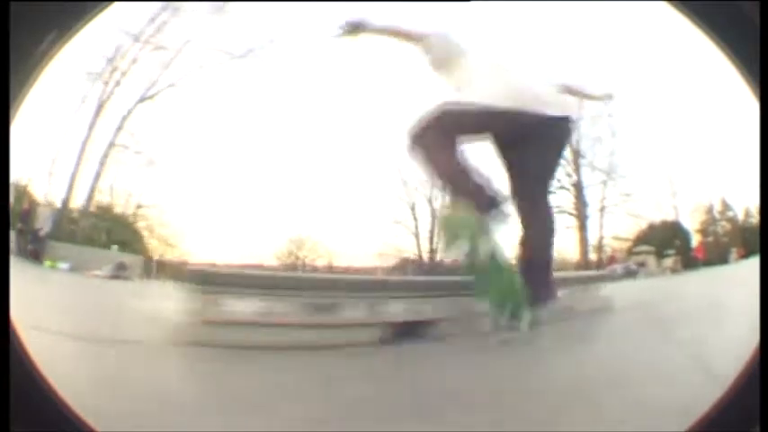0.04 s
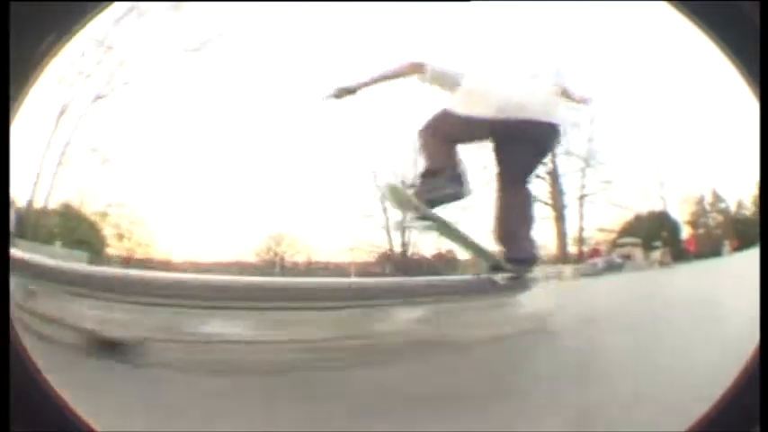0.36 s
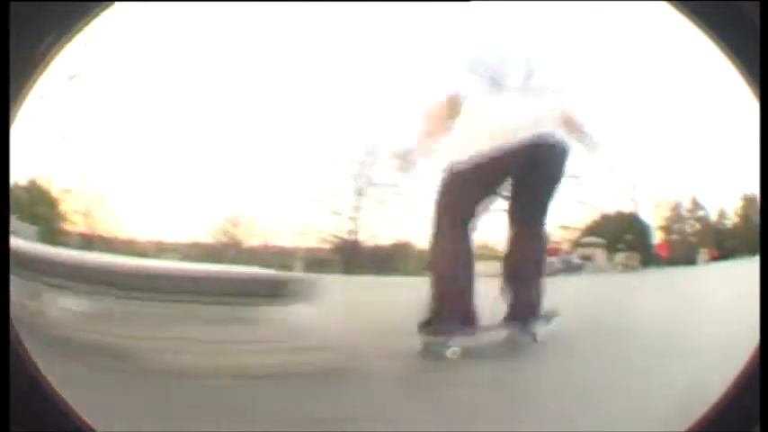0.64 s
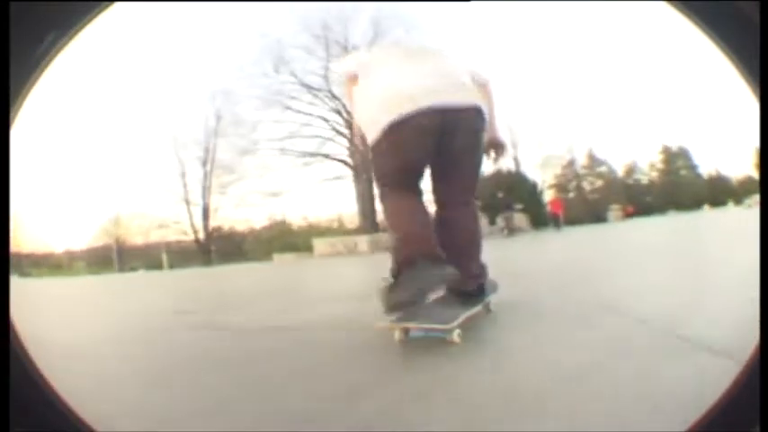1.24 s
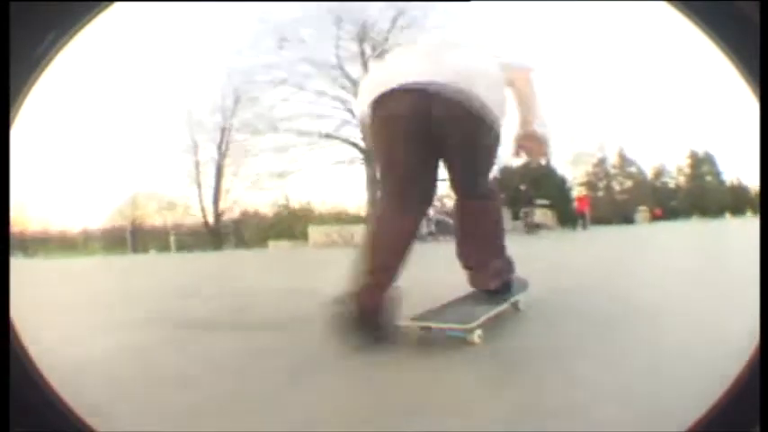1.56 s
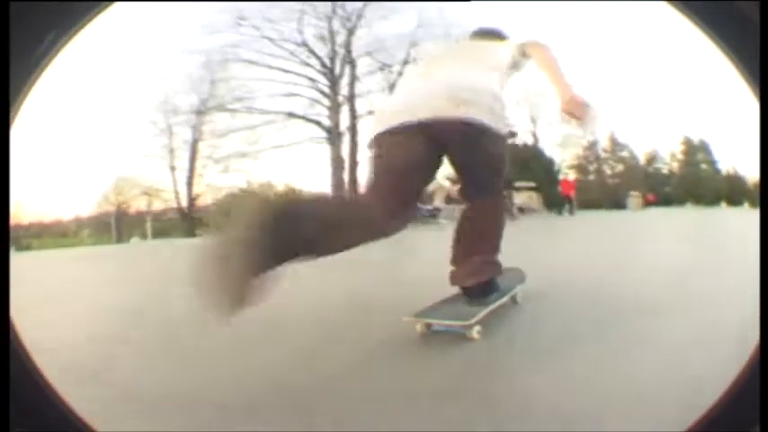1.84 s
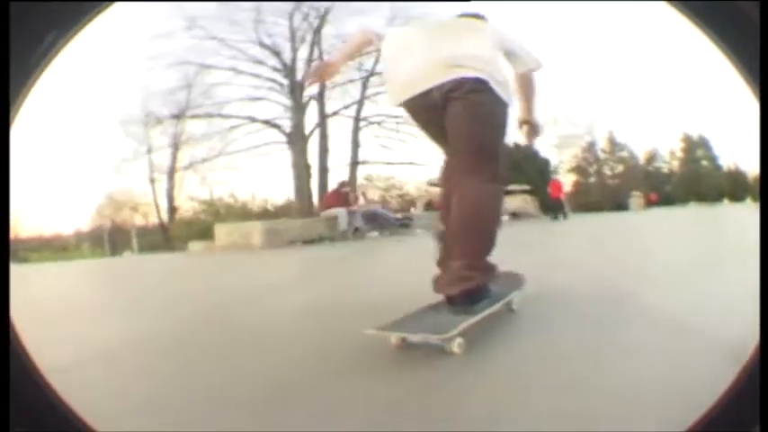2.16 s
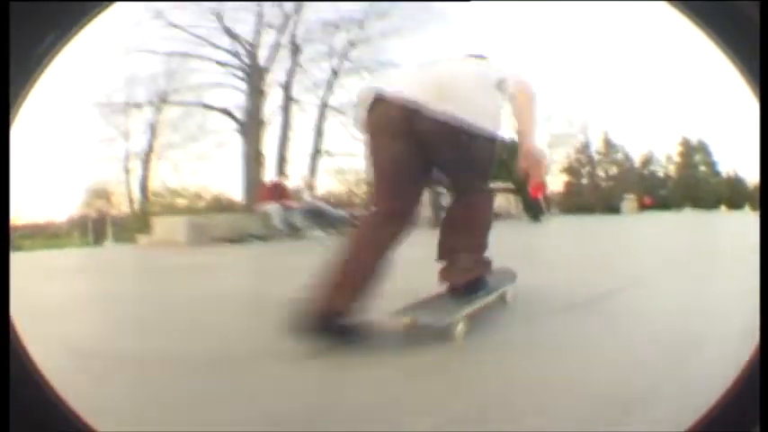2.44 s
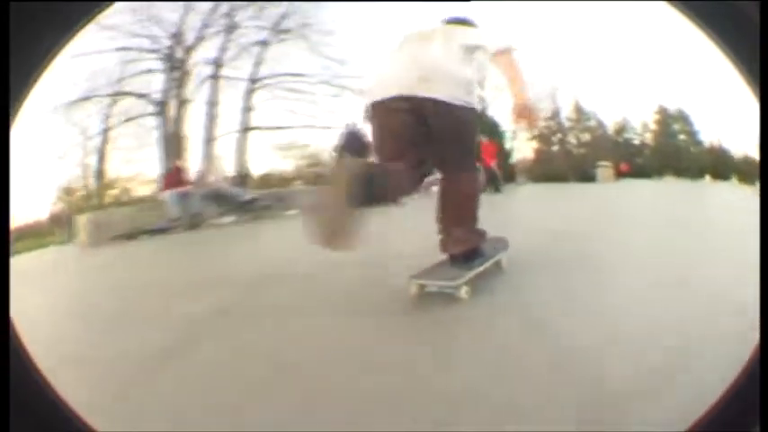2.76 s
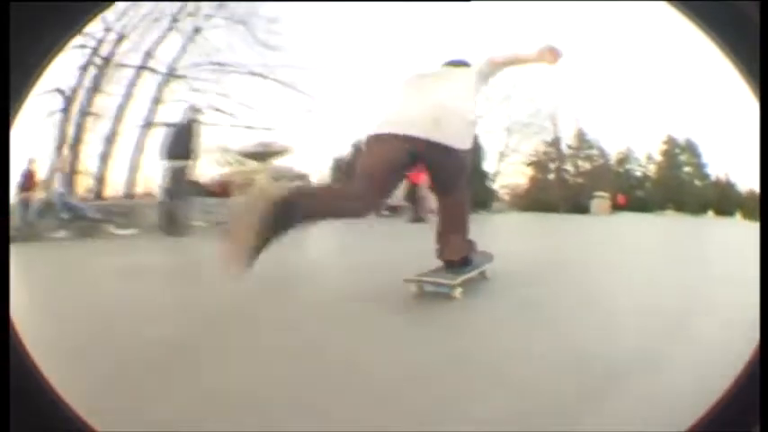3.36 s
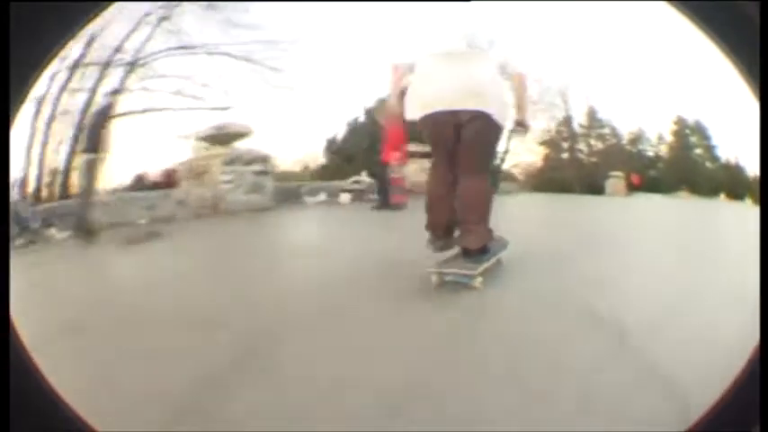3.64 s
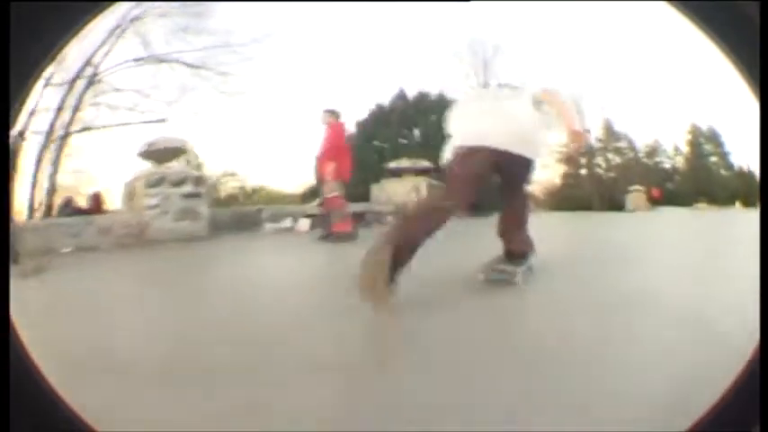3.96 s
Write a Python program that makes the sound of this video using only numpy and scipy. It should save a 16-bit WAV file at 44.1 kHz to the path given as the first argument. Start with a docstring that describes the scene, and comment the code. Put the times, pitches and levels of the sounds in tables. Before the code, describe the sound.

A skateboard pops, scrapes a ledge, lands and rolls on over concrete.

```python
"""A skateboarder pops his board, and its trucks strike a concrete ledge; each impact rings the deck.
The board slides briefly by stick-slip friction and slams down at about 0.6 s. He then pushes away
across a plaza: hard wheels rumble over grit and clack across joints, bearings hiss, and a shoe thuds
and scuffs. Throughout, a microphone follows close behind: air buffets its ports, and the big hits
overload it."""
import sys
import numpy as np
from scipy import signal
from scipy.fft import rfft, irfft, next_fast_len
from scipy.io import wavfile
from scipy.ndimage import map_coordinates

SR = 44100
rng = np.random.default_rng(int(sys.argv[2]) if len(sys.argv) > 2 else 0)


def master_out(mix):
    """Clip the mix to full scale and print it as 16-bit PCM to the path in sys.argv[1]."""
    frames = np.transpose(np.atleast_2d(mix))
    ceiling = np.clip(frames, -1, 1)
    pcm = np.round(ceiling * 32767).astype(np.int16)
    wavfile.write(sys.argv[1], SR, pcm)


N = 176400

# Envelopes of wind, rumble, wheel noise, gritty upper mids, bearing hiss and slide: t/s, level/dB
WIND_LEVEL = [(0.45, -63), (0.7, -41), (0.86, -39), (1.05, -40), (1.15, -58), (1.4, -39.5), (1.7, -52),
              (1.86, -30), (1.94, -30), (2.01, -39), (2.2, -43), (2.33, -37), (2.6, -39), (2.88, -31.5),
              (3.1, -33), (3.48, -32), (3.58, -24.5), (3.72, -47), (4, -39)]
RUMBLE_LEVEL = [(0, -35.5), (0.2, -33.5), (0.55, -42.5), (0.8, -36), (1.15, -41.5), (1.6, -38),
                (2.1, -32.5), (2.6, -37), (2.95, -33), (3.55, -30), (3.72, -43), (4, -30.5)]
ROLL_LEVEL = [(0, -26.5), (0.19, -27.5), (0.42, -32.5), (0.58, -32.5), (0.7, -30), (0.82, -28),
              (1.1, -28.5), (1.26, -24), (1.52, -26), (1.8, -28), (1.98, -26), (2.15, -22), (2.3, -26),
              (2.68, -26.5), (2.97, -22.5), (3.2, -24), (3.45, -25), (3.8, -23), (4, -24)]
WHIRR_LEVEL = [(0, -32), (0.2, -37), (0.5, -43.5), (1.1, -40.5), (1.3, -34.5), (1.55, -34), (1.78, -40.5),
               (2.1, -32), (2.3, -34), (2.7, -34.5), (2.98, -26.5), (3.15, -32.5), (3.4, -38), (3.6, -28),
               (3.78, -28.5), (4, -36.5)]
BEARING_LEVEL = [(0.0, -40), (0.17, -44.5), (0.44, -49), (1.12, -49.5), (1.3, -46.5), (1.68, -45),
                 (1.78, -53.5), (1.95, -44.5), (2.15, -45), (2.27, -47), (2.42, -43), (2.6, -50),
                 (2.8, -44), (3.1, -39.5), (3.44, -47), (3.62, -40.5), (3.87, -38), (3.97, -45)]
SLIDE_LEVEL = [(0.24, -29), (0.28, -32.5), (0.303, -21), (0.335, -20.5), (0.352, -17.5), (0.38, -15.5),
               (0.393, -18.5), (0.403, -31), (0.44, -43)]

# Spectra of the continuous sounds: f/Hz, level/dB
WIND_SPECTRUM = [(20, -26), (50, -2.5), (85, 5), (130, -6.5), (220, -8.5), (600, -62)]
RUMBLE_SPECTRUM = [(40, -13.5), (90, -16), (125, -3.5), (150, 3), (200, -3.5), (350, 0), (900, -60)]
ROLL_SPECTRUM = [(80, -35), (200, -27), (370, 2), (480, -3.5), (750, -1), (1180, -3), (1500, -13),
                 (2200, -20), (3000, -22.5), (4300, -29.5), (9000, -57)]
SING_SPECTRUM = [(400, -21), (750, -1.5), (930, 1), (1200, 0.5), (1400, -12), (2000, -46), (4000, -60)]
WHIRR_SPECTRUM = [(700, -33), (1400, 5.5), (1900, 5.5), (2350, 1), (2900, -9.5), (3500, -6), (4300, -28),
                  (8000, -45)]
BEARING_SPECTRUM = [(800, -27), (1800, 4.5), (3500, 4.5), (4300, 1.5), (5500, 3.5), (7500, 1), (9500, -6),
                    (12000, -14), (15000, -27)]
# Spectra of the brief contacts: f/Hz, level/dB
SCUFF_SPECTRUM = [(300, -36), (1500, 16.5), (3000, 9.5), (7500, 7), (11000, -0.5), (15000, -13)]
KNOCK_SPECTRUM = [(80, -50), (200, -1.5), (350, -4), (600, -4.5), (1250, -1), (1700, -11.5), (3000, -35.5)]
CLICK_SPECTRUM = [(500, -34), (1400, 0), (2300, 7.5), (3000, -4), (4500, -9), (7500, -12), (11000, -29),
                  (15000, -73)]
SLIDE_SPECTRUM = [(70, -12), (130, -16), (215, -7.5), (330, -1.5), (560, -8), (850, 0), (1150, -0.5),
                  (1450, -7.5), (1750, -2.5), (2150, -11), (2600, -2), (3200, -13), (3900, -6), (5300, -13),
                  (8500, -17), (11000, -27), (15000, -34)]
CRACK_SPECTRUM = [(100, -27), (250, 1), (900, -27), (1600, 1), (3300, 2.5), (5500, -5), (8500, -11.5),
                  (11000, -17.5), (15000, -27)]
# Responses of the microphone to close sounds and of the plaza: f/Hz, gain/dB
MIC_RESPONSE = [(20, -26), (60, -16), (100, -8.5), (140, 1), (9000, -1), (12500, -7.5), (15000, -15)]
PLAZA_RESPONSE = [(200, -33), (2000, 12), (3500, 7), (10000, 3.5)]

# Left-right correlation of wind, rumble, the ride and the trick: f/Hz, correlation/1
WIND_CORR = [(50, -0.77), (150, -0.85)]
RUMBLE_CORR = [(100, 1.0), (170, 1.0)]
RIDE_CORR = [(100, 1), (330, 1), (700, 0.92), (1300, 0.51), (2500, -0.023), (4000, -0.3), (7000, 0.26),
             (14000, -0.26)]
TRICK_CORR = [(300, 1), (1300, 0.8), (3000, 0.58), (7000, 0.38), (14000, .2)]
# Leftward lean of the wheels: t/s, left boost and right cut/dB
WHEEL_PAN = [(0, 0.5), (1.2, 1), (2.6, 1.67), (4, 1)]

# Resonances of the wheels and of the sliding deck: f/Hz, width/Hz, lift/dB
WHEEL_RINGS = [(391, 77, 2), (569, 87, 6.5), (976, 19, 5.5), (1203, 45, 5.5)]
DECK_RINGS = [(230, 66, 8), (2380, 130, 4), (2980, 100, 4.5), (3860, 110, 0), (5280, 160, 8)]
# Normal modes of deck and trucks: f/Hz, level/dB, T60 before the cap/s
DECK_MODES = [(154, -17.5, 0.052), (249, -13, 0.046), (361, -9.5, 0.032), (595, -13.5, 0.049),
              (684, -8, 0.031), (976, -3, 0.021), (1194, 0, 0.016), (1680, -9.5, 0.043), (1940, -15, 0.061),
              (3590, -7.5, 0.013), (5316, -9.5, 0.023), (7200, -8.5, 0.018)]

# Soles scraping grip tape and pavement: t/s, duration/s, level/dB, centre f/Hz
SCUFFS = [(0.61, 0.0046, -20.5, 3520), (0.7, 0.1, -37.5, 3100), (0.76, 0.011, -27, 3400),
          (1.861, 0.0047, -26, 4900), (1.313, 0.022, -34, 4870), (1.408, 0.012, -31, 3320),
          (1.621, 0.042, -26, 2970), (2.314, 0.1, -29, 3280), (2.368, 0.0086, -26, 7300),
          (2.441, 0.015, -27, 4270), (2.655, 0.011, -37.5, 6600), (2.863, 0.032, -27.5, 5900),
          (3.041, 0.037, -18, 3070), (3.11, 0.024, -25, 2270), (3.154, 0.016, -25.5, 5760),
          (3.258, 0.01, -25, 2380), (3.494, 0.028, -29.5, 7300), (3.528, 0.012, -33, 6500),
          (3.628, 0.022, -32, 3360), (3.848, 0.015, -30, 7000)]
# Take-off stamp, shifts of weight and pushes: t/s, level/dB, f/Hz
STEPS = [(0.0, -19.5, 153.2), (0.795, -27.5, 228), (1.242, -28.5, 197), (1.969, -35, 125),
         (2.145, -24.5, 172), (2.17, -24, 237), (2.856, -9, 122.5), (3.531, -19.5, 134), (3.594, -27, 190)]
# Wheels over joints and feet on the deck: t/s, level/dB, relative click/dB, ring f/Hz
KNOCKS = [(0.201, -20, -6, 613), (0.4787, -18.5, -14, 534), (0.6214, -14, -26, 544),
          (0.806, -20.5, -10, 388), (1.219, -15.5, -14, 980), (1.257, -17.5, -8, 560),
          (1.354, -14, -17, 1140), (1.444, -5.5, -13, 1235), (1.501, -26.5, 2, 1850),
          (1.568, -10.5, -13.5, 1080), (1.723, -17, -17, 355), (1.86, -21, -25, 1000),
          (2.0183, -11.5, -3.5, 980), (2.057, -16, -8.5, 580), (2.369, -19.5, -6, 1860),
          (2.856, -14, -22, 517), (2.876, -9.5, -23, 1020), (2.9585, -11.5, -4.5, 1170),
          (3.253, -14.5, -30, 392), (3.258, -23.5, 4, 890), (3.271, -21.5, 0, 400),
          (3.507, -14.5, -17, 536), (3.533, -14, -20, 910), (3.599, -13.5, -8, 396), (3.61, -24.5, -3, 340),
          (3.636, -18, -4, 326), (3.765, -19, 3, 1050), (3.837, -12.5, 0.5, 960), (3.897, -14.5, 4.5, 725)]
# Pop, trucks onto the ledge, landing: t/s, level/dB, ring f/Hz, relative ring/dB, relative crack/dB
SLAMS = [(0.0, 1.5, 1384, 9.5, 0.5), (0.003, -12, 1940, 7.5, -4), (0.0095, -19.5, 2650, 10, 7),
         (0.2084, -11, 332, 0.5, 0), (0.2111, -8.5, 1120, 3.5, -6), (0.2294, -1.5, 729, 5.5, 1.5),
         (0.2311, -9, 267, 7.5, -20), (0.242, -22, 2090, 13, 6), (0.634, -6.5, 946, 1.5, 2),
         (0.6383, -5, 575, 8, -0.5), (0.642, -4.5, 597, -26, -1.5), (0.652, -22, 1830, -3, -16)]


def amp(db):
    """Amplitude ratio of a level in decibels."""
    return 10 ** (np.asarray(db) / 20)


def unit(x):
    """Normalisation to rms 1."""
    return x / np.sqrt(np.mean(x ** 2) + 1e-20)


def along(points, hz):
    """Interpolation on a logarithmic frequency axis."""
    f, v = np.transpose(points)
    return np.interp(np.log(hz + 1), np.log(f + 1), v)


def level(rows):
    """Amplitude envelope, linear in decibels between points."""
    return amp(np.interp(np.arange(N) / SR, *np.transpose(rows)))


def wobble(rate, size=N):
    """Smooth random modulation with rate knots a second."""
    return map_coordinates(rng.standard_normal(8192), [np.arange(size) * rate / SR], mode="wrap")


def filtered(x, response):
    """Filtering as multiplication in the frequency domain."""
    m = next_fast_len(x.shape[-1] + 8192)
    return irfft(rfft(x, m) * response(np.fft.rfftfreq(m, 1 / SR)), m)[..., :x.shape[-1]]


def causal(x, spectrum):
    """Minimum-phase filtering: no sound precedes an onset."""
    m = next_fast_len(N + 8192)
    log_gain = np.log(amp(along(spectrum, np.fft.rfftfreq(m, 1 / SR))))
    cepstrum = irfft(log_gain, m)
    fold = np.r_[1, np.full(m // 2 - 1, 2), np.zeros(m - m // 2)]
    return irfft(rfft(x, m) * np.exp(rfft(cepstrum * fold)), m)[..., :N]


def shaped(pair, spectrum, correlation, rings=()):
    """Mid-side mixing gives two independent signals a spectrum, correlation and resonances, at rms 1."""
    def response(hz):
        angle = np.arccos(np.clip(along(correlation, hz), -1, 1)) / 2
        lift = sum(db / (1 + (2 * (hz - centre) / width) ** 2) for centre, width, db in rings)
        return amp(along(spectrum, hz) + lift) * np.array([np.cos(angle), np.sin(angle)])
    mid, side = filtered(pair, response)
    return unit(np.array([mid + side, mid - side]))


def noise(size=N):
    """Two independent white noises."""
    return rng.standard_normal((2, size))


def fade(t, t60):
    """Exponential decay by 60 dB in t60 seconds."""
    return np.exp(-np.log(1000) * t / t60)


def rise(t, tau):
    """Exponential onset with time constant tau."""
    return 1 - np.exp(-t / tau)


def mode(t, hz, t60):
    """Free vibration of a damped oscillator."""
    return fade(t, t60) * np.sin(2 * np.pi * hz * t)


def add(out, s, sound):
    """Superposition of a sound starting at s seconds."""
    i = max(0, round(s * SR))
    out[:, i:i + sound.shape[-1]] += sound[..., :N - i]


def panned(x, db):
    """Level-difference panning: left raised and right lowered by db."""
    return x * amp([[db], [-db]])


def grit(per_s, size_db):
    """Shot noise: sparse impulses of uneven size, as from grains under a wheel."""
    hits = rng.random(N) < per_s / SR
    sizes = amp(size_db * np.minimum(rng.exponential(size=N), 4))
    return unit(hits * sizes * noise())


def plaza(x):
    """Reverberation: scatter from ledges and walls dies fast in the open air."""
    t = np.arange(SR // 2) / SR
    scatter = filtered(noise(len(t)), lambda hz: amp(along(PLAZA_RESPONSE, hz)))
    tail = scatter * fade(t, t60=0.4) * rise(t, tau=0.003)
    return signal.fftconvolve(x, tail / np.linalg.norm(tail[0]), axes=1)[:, :N]


def wind(gust_db=2.2):
    """Turbulent pressure drives the two microphone ports largely in antiphase."""
    gusts = noise() * amp(gust_db * wobble(rate=13))
    return level(WIND_LEVEL) * shaped(gusts, WIND_SPECTRUM, WIND_CORR)


def rumble():
    """Low-frequency vibration from rolling arrives in phase on both sides."""
    return level(RUMBLE_LEVEL) * shaped(noise(), RUMBLE_SPECTRUM, RUMBLE_CORR)


def wheels(bumps_db, sing_ref_db=-22.5, sing_power=3.12):
    """Forced vibration: rough concrete shakes wheels and deck, which sing steeply louder under load."""
    def road():
        return amp(bumps_db) * (noise() + amp(-7) * grit(per_s=700, size_db=2))
    load = level(ROLL_LEVEL)
    roll = amp(-2) * load * shaped(road(), ROLL_SPECTRUM, RIDE_CORR, WHEEL_RINGS)
    sing_gain = amp(sing_ref_db - 1.5) * (load / amp(sing_ref_db)) ** sing_power
    sing = sing_gain * shaped(road(), SING_SPECTRUM, RIDE_CORR)
    flicker = amp(bumps_db + 0.98 * wobble(rate=110))
    crunch = flicker * (noise() + amp(-2) * grit(per_s=500, size_db=5.8))
    whirr = amp(-1.5) * level(WHIRR_LEVEL) * shaped(crunch, WHIRR_SPECTRUM, RIDE_CORR)
    return roll + sing + whirr


def bearings(bumps_db):
    """Rolling contact of the balls gives hiss and sparse ticks, modulated by the bumps."""
    flicker = amp(1.02 * bumps_db + 0.44 * wobble(rate=140))
    balls = flicker * (noise() + amp(-9) * grit(per_s=140, size_db=-4))
    return amp(5) * level(BEARING_LEVEL) * shaped(balls, BEARING_SPECTRUM, RIDE_CORR)


def scuffs(grains_per_s=1500, rasp_db=4.5):
    """Sliding friction of a sole gives grainy, rasping noise with one broad peak."""
    out, size = np.zeros((2, N)), SR // 8
    for s, length, db, hz in SCUFFS:
        friction = noise(size) + amp(4) * unit(noise(size) * (rng.random(size) < grains_per_s / SR))
        n = int(np.clip(length * SR, 8, size))
        stroke = np.sqrt(np.abs(np.hanning(n)))
        rasp = unit(amp(rasp_db * wobble(rate=240, size=n)))
        scrape = shaped(friction, SCUFF_SPECTRUM, RIDE_CORR, rings=[(hz, 0.58 * hz, 14)])
        add(out, s, amp(db) * stroke * rasp * scrape[:, :n])
    return out


def steps():
    """Soft impact: each foot thuds as one low damped mode with a slow onset."""
    out, t = np.zeros((2, N)), np.arange(SR // 3) / SR
    for s, db, hz in STEPS:
        add(out, s, 2 * amp(db) * rise(t, tau=0.02) * mode(t, hz, t60=0.14))
    return out


def knocks():
    """Damped impact: the loaded board knocks dully and rings briefly, and its trucks click."""
    out, t = np.zeros((2, N)), np.arange(SR // 8) / SR
    for s, db, click_db, ring_hz in KNOCKS:
        envelope = fade(t, t60=0.04) * rise(t, tau=0.0004)
        body = envelope * shaped(noise(len(t)), KNOCK_SPECTRUM, RIDE_CORR, WHEEL_RINGS)
        ring = mode(t, ring_hz, t60=0.024)
        click = fade(t, t60=0.037) * shaped(noise(len(t)), CLICK_SPECTRUM, RIDE_CORR)
        add(out, s, amp(db) * (amp(1) * body + amp(-2) * ring + amp(click_db) * click))
    return out


def slide(slip_db=3, pitch_drift=0.02, edge_hz=3000, brightening=0.24):
    """Stick-slip friction on the ledge drives the deck, brighter the harder it bites."""
    t = np.arange(N) / SR
    bite = level(SLIDE_LEVEL) * (t > SLIDE_LEVEL[0][0]) * (t < SLIDE_LEVEL[-1][0])
    grip = amp(slip_db * wobble(rate=343))
    slips = unit(grip * (noise() + amp(-6.5) * grit(per_s=1500, size_db=3.5)))
    scrape = shaped(slips, SLIDE_SPECTRUM, TRICK_CORR, DECK_RINGS)
    # The resonances shift as the contact moves.
    position = np.cumsum(1 + pitch_drift * wobble(rate=21.9))
    scrape = np.array([map_coordinates(side, [position], mode="wrap") for side in scrape])
    edge = filtered(scrape, lambda hz: hz ** 2 / (hz ** 2 + edge_hz ** 2))
    return bite * (scrape + brightening * (bite / bite.max() - 0.5) * edge)


def slams(t60_cap=0.055):
    """Modal excitation: each blow cracks and rings the deck; where it lands selects the main ring."""
    out, t = np.zeros((2, N)), np.arange(SR // 5) / SR
    for s, db, ring_hz, ring_db, crack_db in SLAMS:
        modes = np.zeros(len(t))
        for hz, mode_db, t60 in DECK_MODES:
            weight = amp(mode_db + rng.normal(0, 1.8)) * rng.choice([-1, 1])
            modes += weight * mode(t, hz, min(t60, t60_cap))
        ring_t60 = 0.027 * (1000 / ring_hz) ** 0.43  # low rings last longer
        ring = amp(ring_db) * mode(t, ring_hz, ring_t60)
        crack = amp(crack_db) * fade(t, t60=0.021) * shaped(noise(len(t)), CRACK_SPECTRUM, TRICK_CORR)
        add(out, s, amp(db) * (amp(-3.5) * modes + amp(-4.5) * ring + amp(1) * crack))
    return out


def scene():
    """Superposition of the close contacts, their reverberation, the rolling and the wind."""
    trick = panned(slams() + slide(), db=-0.5)
    footwork = panned(knocks() + scuffs() + steps(), db=0.3)
    close = causal(trick + footwork, MIC_RESPONSE)
    reverberation = amp(-25) * plaza(close)
    bumps_db = 1.43 * wobble(rate=47.1)  # wheels and bearings feel the same roughness
    rolling = wheels(bumps_db) + bearings(bumps_db)
    lean = level(WHEEL_PAN)
    return close + reverberation + rolling * np.array([lean, 1 / lean]) + rumble() + wind()


def record(dry):
    """Saturation and band limiting: the microphone flattens big peaks and loses the highest treble."""
    ceiling, top_hz = 0.95, 15100
    saturated = dry / (1 + np.abs(dry / ceiling) ** 6) ** (1 / 6)
    return filtered(saturated, lambda hz: hz < top_hz)


dry = scene()
out = record(dry)
master_out(out)
```